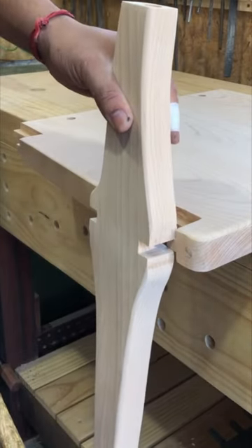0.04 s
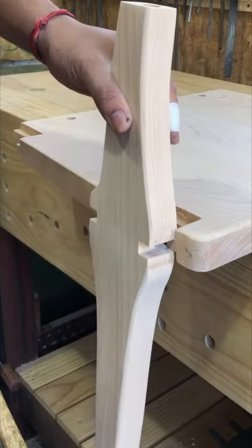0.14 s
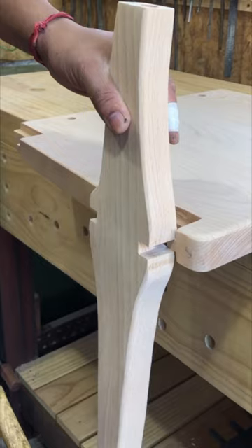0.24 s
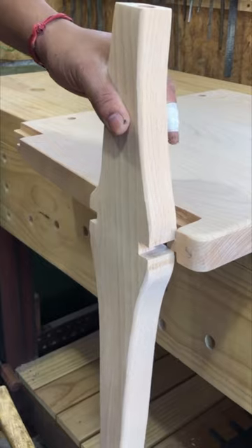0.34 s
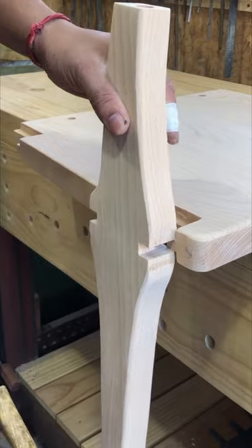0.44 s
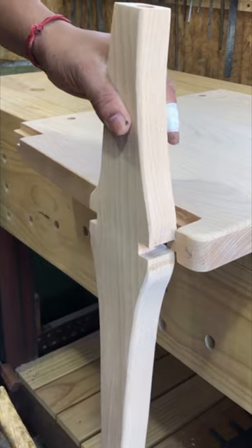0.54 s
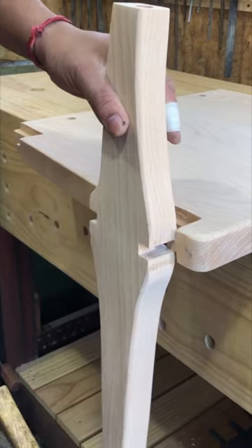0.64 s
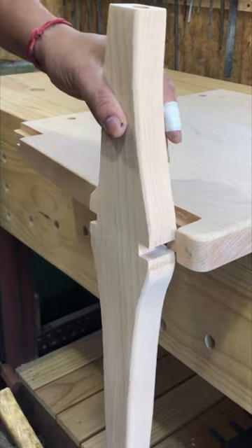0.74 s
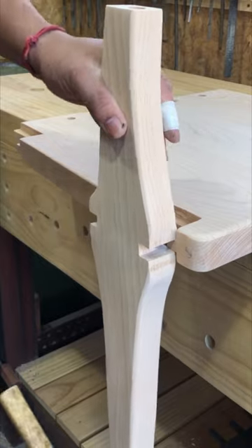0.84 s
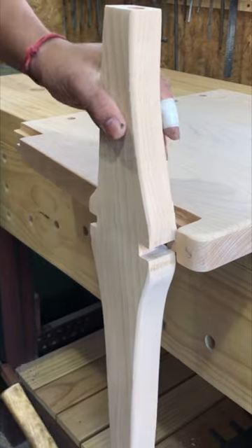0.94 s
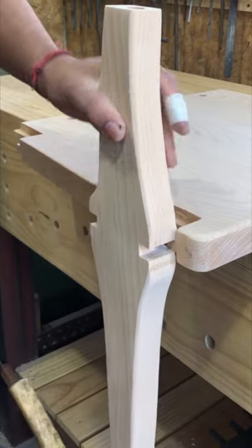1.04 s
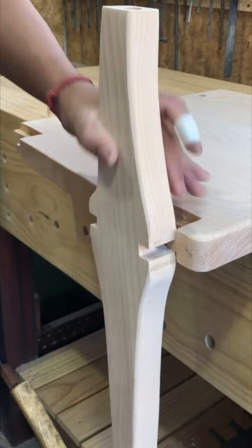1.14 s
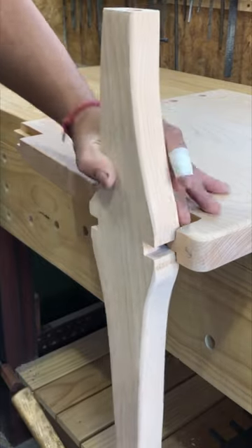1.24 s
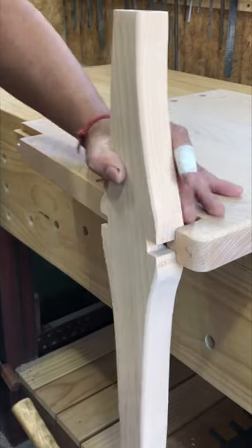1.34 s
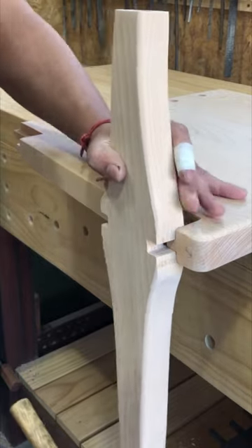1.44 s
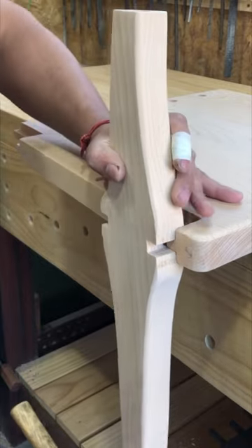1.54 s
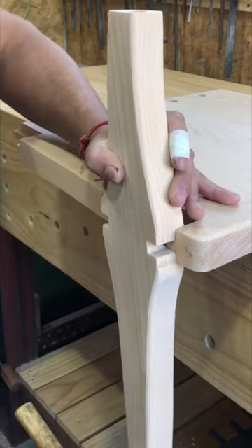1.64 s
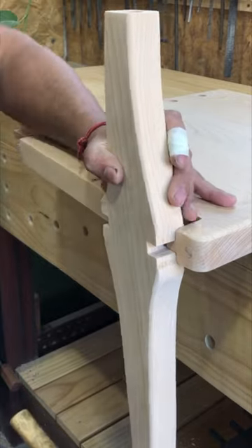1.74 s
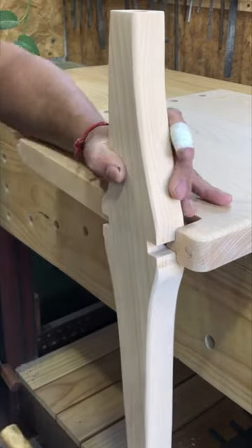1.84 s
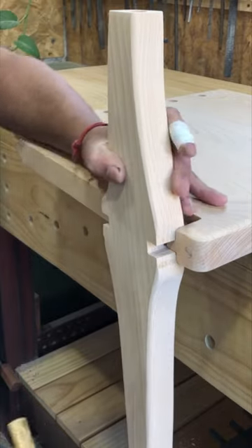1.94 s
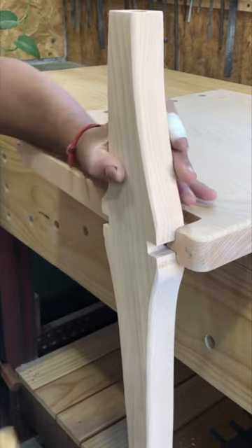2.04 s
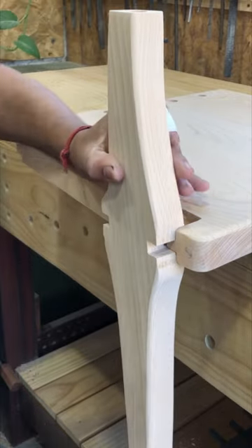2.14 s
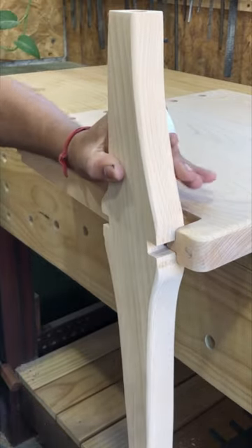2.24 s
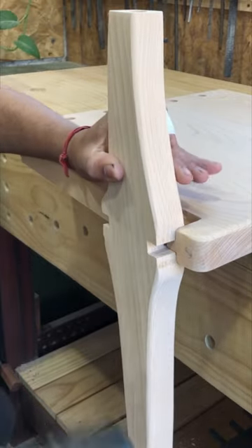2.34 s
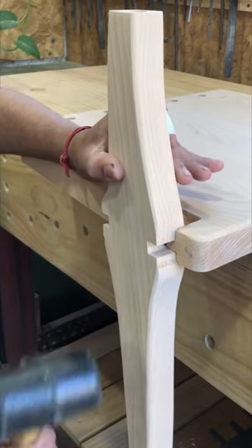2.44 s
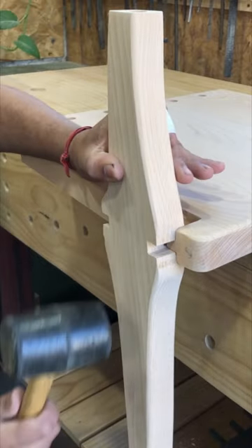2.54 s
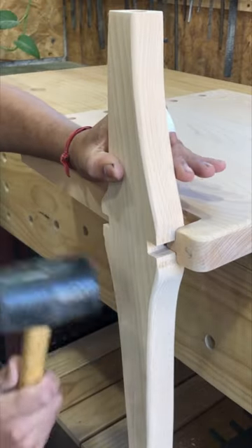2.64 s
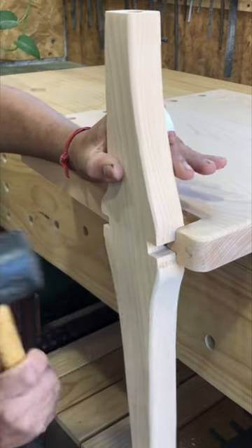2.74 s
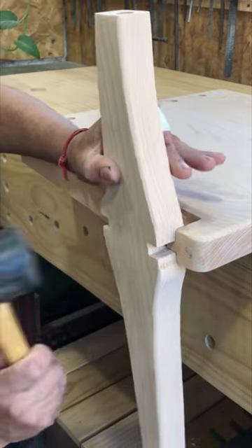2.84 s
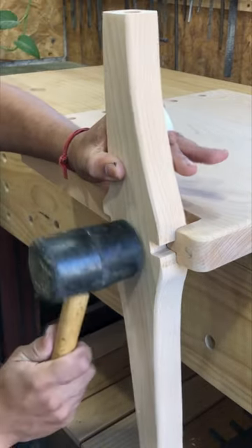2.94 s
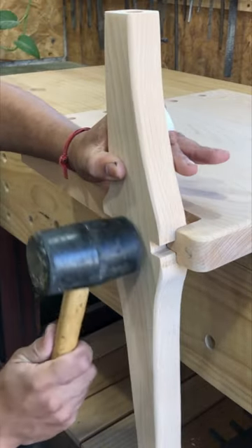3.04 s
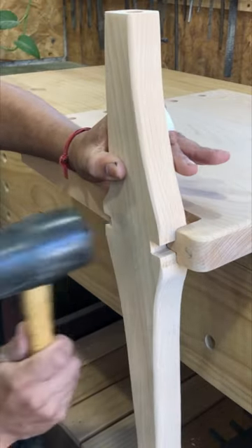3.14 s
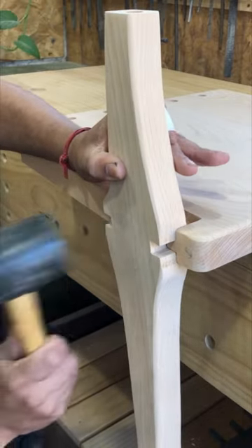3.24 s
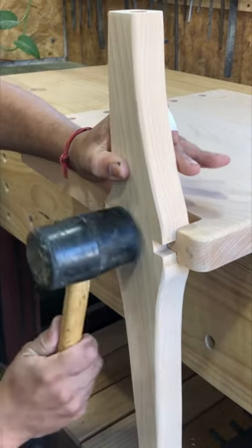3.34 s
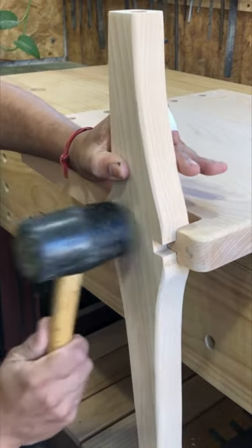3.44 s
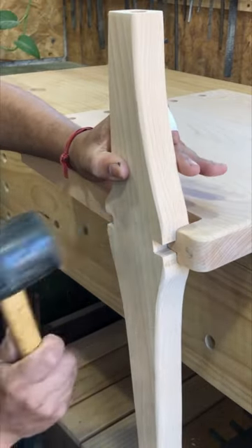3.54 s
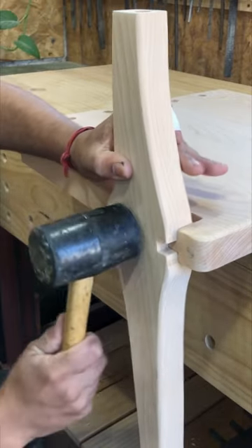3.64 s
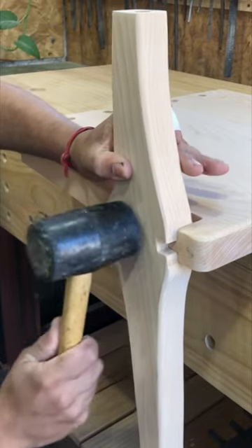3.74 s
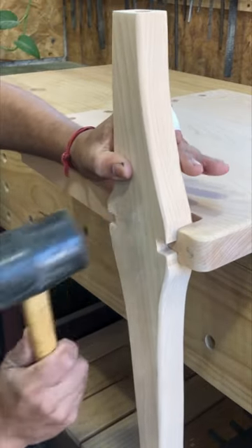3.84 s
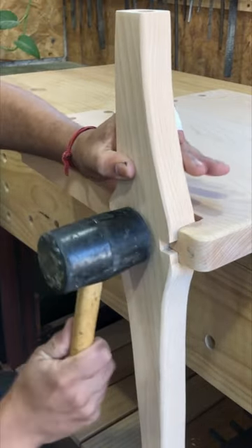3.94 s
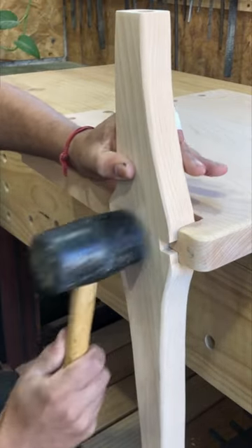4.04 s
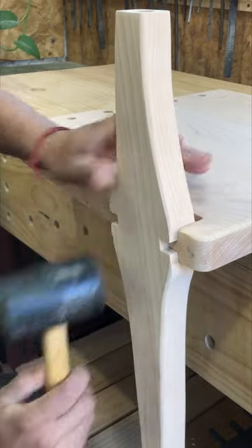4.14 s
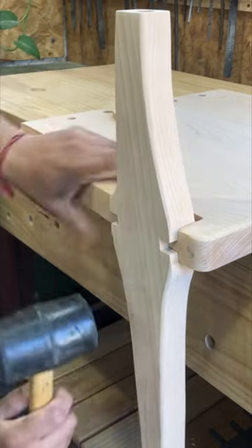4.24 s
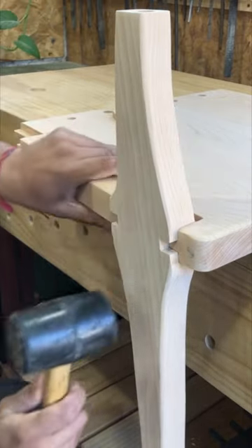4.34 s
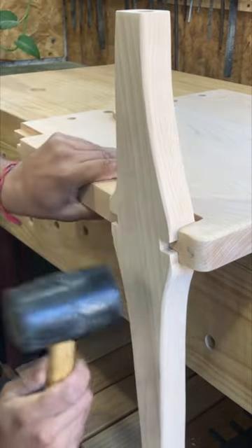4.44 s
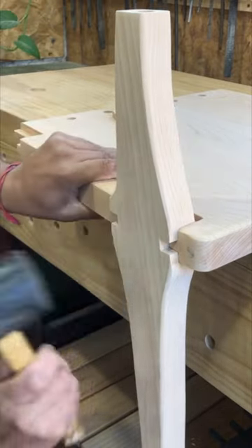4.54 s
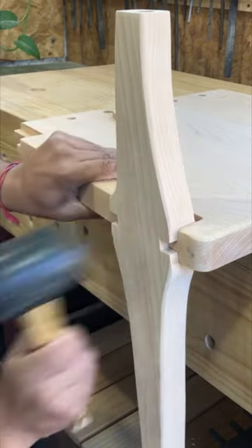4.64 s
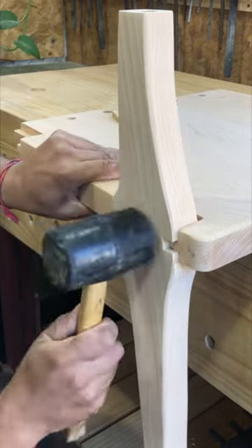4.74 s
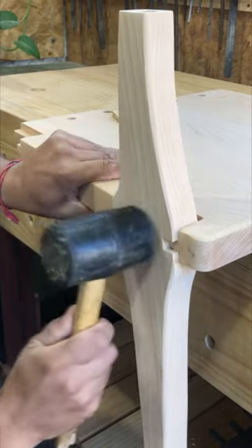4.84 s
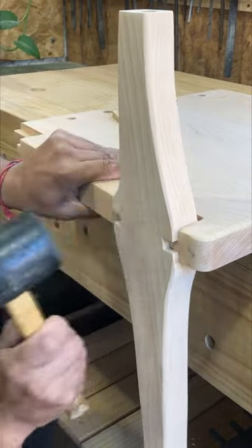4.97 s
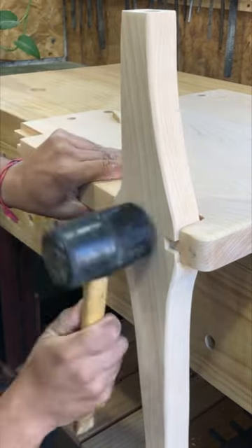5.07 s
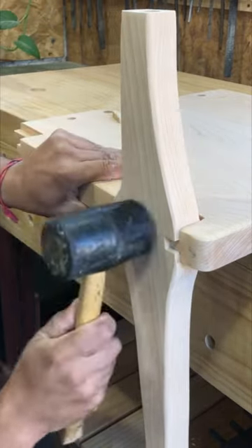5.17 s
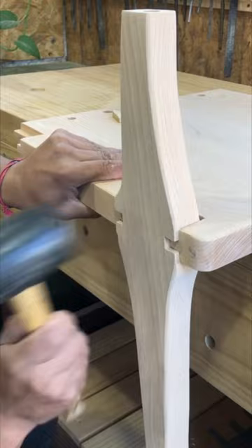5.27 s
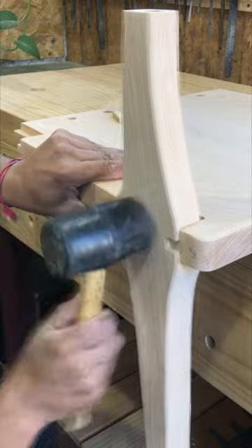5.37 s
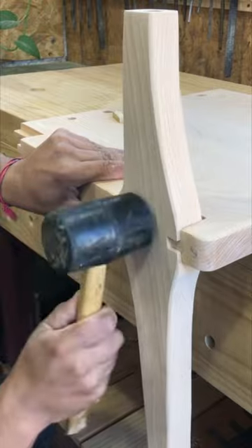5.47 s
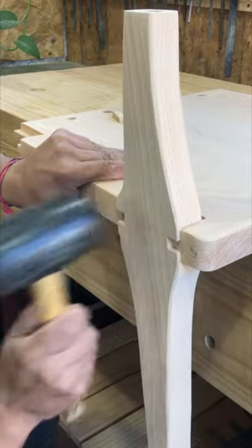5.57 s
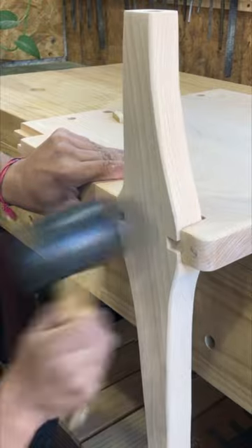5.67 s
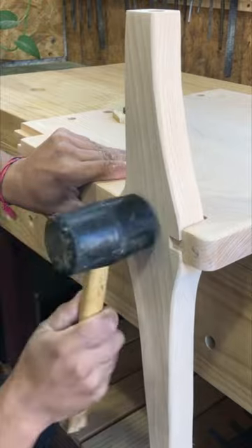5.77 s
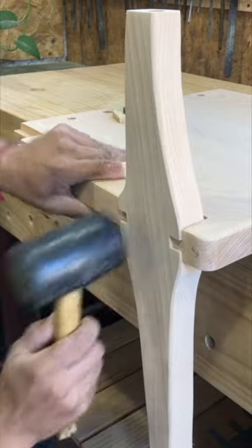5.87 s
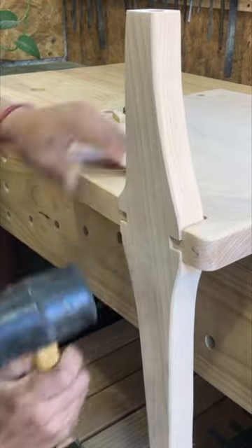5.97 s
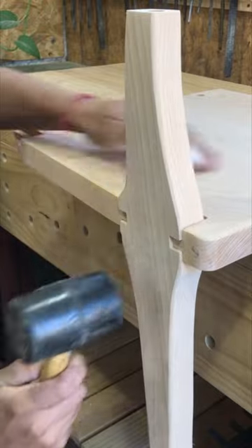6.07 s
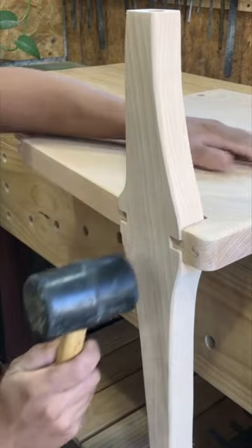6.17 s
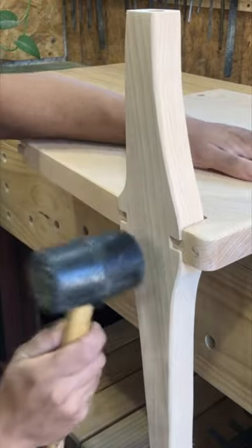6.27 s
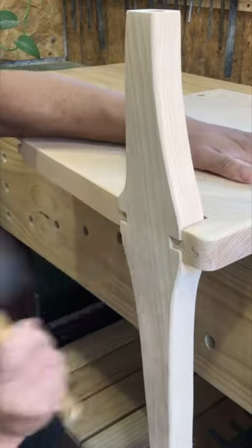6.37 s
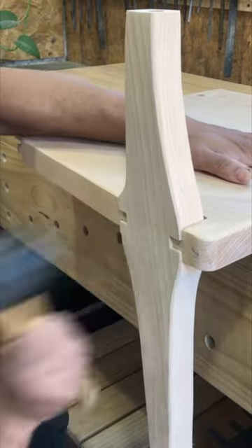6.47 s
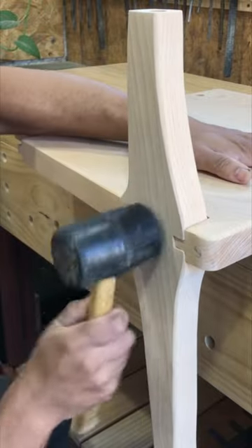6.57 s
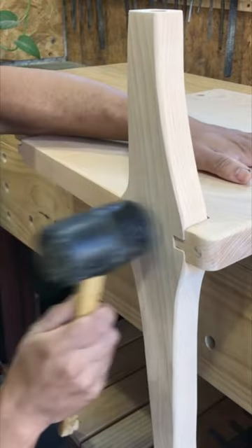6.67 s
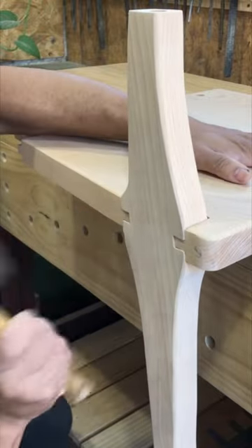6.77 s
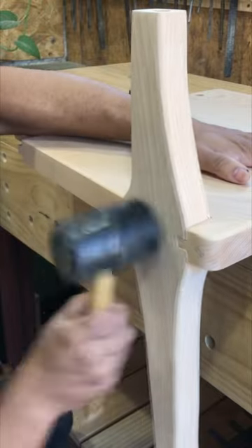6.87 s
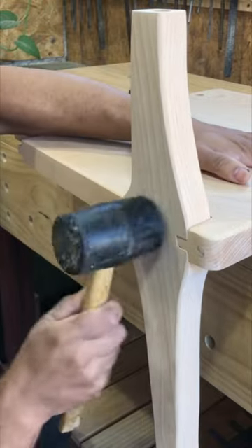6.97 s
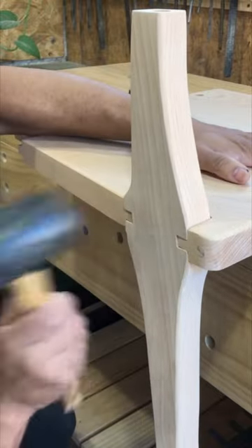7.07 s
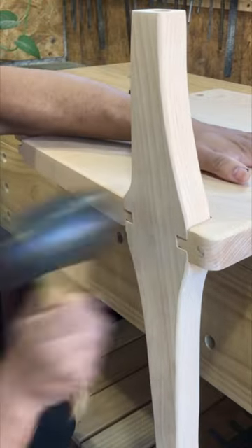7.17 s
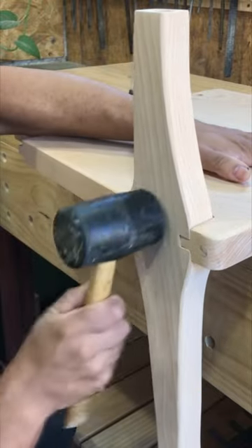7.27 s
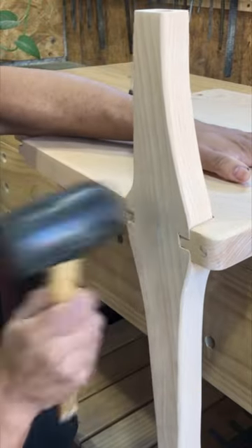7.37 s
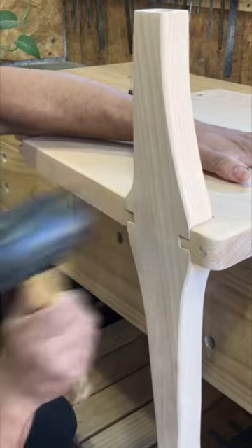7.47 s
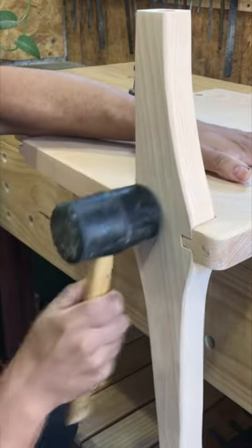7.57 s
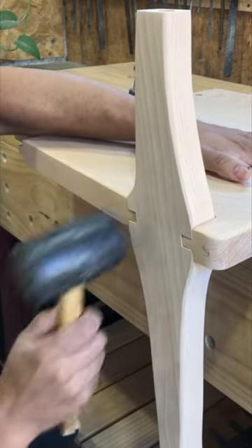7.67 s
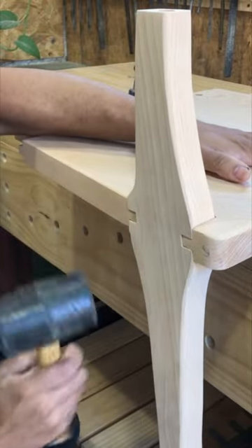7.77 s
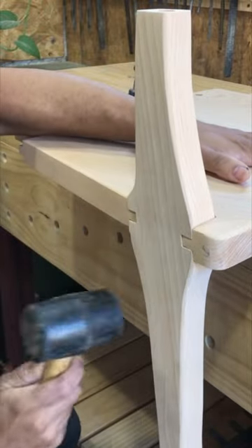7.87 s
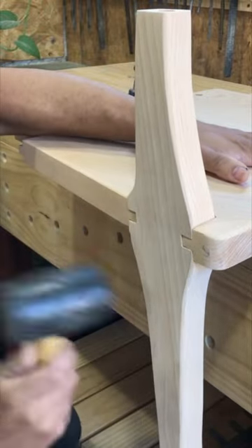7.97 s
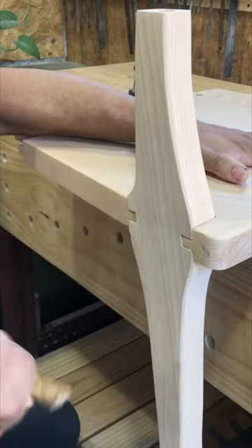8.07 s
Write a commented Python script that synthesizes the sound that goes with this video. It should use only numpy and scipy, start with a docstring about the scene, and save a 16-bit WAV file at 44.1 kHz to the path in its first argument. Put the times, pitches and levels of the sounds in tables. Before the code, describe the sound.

In a quiet workshop, skin brushes a wooden seat, then twelve solid, woody mallet blows fall in three groups of four, with short room reverberation.

```python
"""A soft bump and faint scrapes in quiet workshop air, then a hand sliding over a wooden chair seat.
A rubber mallet then drives the leg into its seat joint on a workbench, in three runs of four blows.
Air, skin and scrapes are coloured noise under swelling envelopes; bumps and ticks are short noise bursts.
Each blow is a noise crack, a sum of decaying modes and a dense reverberant return of the shop.
The recorder's fast limiter ducks the first instant of the blows."""
import sys
import numpy as np
from scipy import signal
from scipy.fft import rfft, irfft
from scipy.io import wavfile
from scipy.ndimage import uniform_filter1d, minimum_filter1d

SR = 44100
rng = np.random.default_rng(int(sys.argv[2]) if len(sys.argv) > 2 else 0)


def materialize(psi):
    """Save the field psi as 16-bit PCM at rate SR to the path in sys.argv[1].

    A 1-D psi becomes a single channel; in a 2-D psi each row is a channel.
    """
    bounded = np.clip(np.atleast_2d(psi).T, -1, 1)
    quanta = np.round(bounded * 32767).astype(np.int16)
    wavfile.write(sys.argv[1], SR, quanta)


N = 357651
LENGTH = 24576  # samples in one short sound
EDGE_HZ = 16000  # upper band limit
AGE, TIME = np.arange(LENGTH) / SR, np.arange(N) / SR  # s since a sound began, s since the scene began


def amp(db):
    """Level to gain: 20 dB is a factor of ten in amplitude."""
    return 10 ** (np.asarray(db) / 20)


def unit(x):
    """Normalization: scales to rms 1."""
    return x / np.sqrt(np.mean(x ** 2) + 1e-20)


def read(points, hz):
    """Interpolation of a (f, value) table along a logarithmic frequency axis."""
    f, value = np.transpose(points)
    return np.interp(np.log(hz + 1), np.log(f + 1), value)


def add(mix, s, sound):
    """Superposition: adds a sound to the mix from time s on."""
    part = mix[max(round(s * SR), 0):][:len(sound)]
    part += sound[:len(part)]


def shaped(x, db_at):
    """Linear filtering: weights the spectrum of x by a rule Hz -> dB, then scales to rms 1."""
    hz = np.fft.rfftfreq(len(x), 1 / SR)
    return unit(irfft(rfft(x) * amp(db_at(hz)), len(x)))


def noise(db_at, size=LENGTH):
    """Coloured noise: white noise through a spectral weighting."""
    return shaped(rng.standard_normal(size), db_at)


def burst(db_at, size=256):
    """Impulsive excitation: before colouring, the first `size` samples hold every frequency evenly."""
    even = irfft(np.exp(2j * np.pi * rng.random(size // 2 + 1)))
    tail = rng.standard_normal(LENGTH - size) * even.std()
    return shaped(np.concatenate([even, tail]), db_at)


def lowpass(x, hz):
    """First-order low-pass: a gentle, causal loss of treble."""
    sos = signal.butter(1, min(hz, SR / 2 - 1), fs=SR, output="sos")
    return signal.sosfilt(sos, x)


def accent(x, hz, db, sharpness=7):
    """Resonance: lifts the band that the spot of the blow or the joint favours."""
    band = signal.lfilter(*signal.iirpeak(hz, sharpness, fs=SR), x)
    return x + (amp(db) - 1) * band


def dying(x, t60_at):
    """Frequency-dependent damping: each frequency decays with its own t60."""
    hz, t, z = signal.stft(x, SR, nperseg=256)
    decay = amp(-60 * t / t60_at(hz)[:, None])
    return signal.istft(z * decay, SR, nperseg=256)[1][:len(x)]


def swell(peak_s, db, swell_s, t60):
    """Friction follows speed: the level grows 20 dB over the swell time, peaks, then dies away."""
    rise_db = 20 * np.maximum(peak_s - TIME, 0) / swell_s
    fall_db = 60 * np.maximum(TIME - peak_s, 0) / t60
    return amp(db - rise_db - fall_db)


# workshop reverberation: (f/Hz, t60/s)
SHOP_DECAY = [(70, 0.35), (200, 0.34), (500, 0.32), (1200, 0.32), (3000, 0.29), (6000, 0.25), (10000, .23),
              (16000, 0.12)]


def reverberant(x, late_db=-27, late_t60=0.7):
    """Double-slope reverberation: a fast decay in the shop over a weak lingering one."""
    early = dying(x, lambda hz: read(SHOP_DECAY, hz))
    return early + amp(late_db - 60 * AGE / late_t60) * lowpass(x, 1200)


# spectrum of the workshop air: (f/Hz, level/dB per Hz)
AIR_SPECTRUM = [(18, -35), (30, -3.5), (86, -0.5), (170, 0), (287, -3), (540, -4.5), (684, -9.5),
                (1630, -13.5), (2120, -20), (9220, -30), (14800, -29.5), (16000, -33.5)]
# resonances of the scrapes: (f/Hz, width/Hz, level/dB)
SCRAPE_RESONANCES = [(790, 90, 3), (950, 61, 3), (1214, 110, -2.5), (2000, 250, -12.5)]
# faint scrapes in the shop: (t/s of the loudest moment, level/dB, swell/s, fade t60/s)
SCRAPES = [(.03, -52, 0.048, 0.15), (.17, -52, 0.3, 0.54), (.7, -66.5, 0.26, 1), (0.921, -64, 0.23, 0.43)]


def background(air_db=-62.5, sinks_from_s=5.7, sink_db_per_s=3):
    """Incoherent sources add in power: quiet air with a low rustle, and faint resonant scrapes."""
    steady = amp(air_db - sink_db_per_s * np.maximum(TIME - sinks_from_s, 0))
    # a low rustle while the hand changes its hold
    rustle = swell(1.95, -58, 1.55, 1.4)
    air = noise(lambda hz: read(AIR_SPECTRUM, hz), size=N) * np.hypot(steady, rustle)

    def resonances_db(hz):
        """Resonance curves: each scrape band peaks at its own frequency."""
        return 20 * np.log10(sum(amp(db) / (1 + (2 * (hz - f) / width) ** 2)
                                 for f, width, db in SCRAPE_RESONANCES))

    scrape = noise(resonances_db, size=N)
    return air + scrape * np.sqrt(sum(swell(*row) ** 2 for row in SCRAPES))


# strokes of the hand over the seat:
# (t/s of the fastest moment, level/dB, swell/s, fade t60/s, bite of the grain/dB relative to the hiss)
STROKES = [(.725, -68.5, .05, .35, 3), (1.076, -57.5, 0.033, 0.17, 1), (1.19, -49, .17, 0.18, -16),
           (1.825, -61, .05, 0.45, -6), (2.045, -51.5, .012, 0.22, -2), (2.15, -56, 0.45, 0.79, 1.5),
           (2.36, -65.5, 0.77, 1.8, 1), (2.9, -72.5, 0.68, 5.5, -1.5), (4.17, -45.5, 0.16, 0.49, -11.5),
           (4.28, -61.5, 0.052, 0.47, 0.5), (6.18, -54.5, 0.14, 0.77, -4), (6.3, -58.5, .16, 0.198, -1),
           (6.42, -75, .1, .5, -0.5)]
# quick swipes of the palm: (t/s, level/dB, rise/s, fade t60/s)
SWIPES = [(1.201, -34.5, 0.012, 0.25), (1.413, -39, 0.055, 0.26), (1.625, -37.5, 0.0087, 0.27)]
# spectrum of the swipes: (f/Hz, level/dB per Hz)
SKIN_SPECTRUM = [(200, -1.5), (900, -2.5), (2000, 0.5), (4500, 5.5), (7000, 1), (11000, -4.5), (16000, -6)]


def hand(catch_db=1.35):
    """Friction noise: skin hisses over sanded wood, catching unevenly on the grain."""
    fine_spectrum = [(1500, -5), (5500, -3), (10000, -2.0), (16000, -2.0)]
    coarse_spectrum = [(300, -20), (1300, 6.0), (4200, 7), (7000, -2), (16000, -16)]
    fine = noise(lambda hz: read(fine_spectrum, hz), size=N)
    coarse = noise(lambda hz: read(coarse_spectrum, hz), size=N)
    hiss_power, bite_power = np.zeros((2, N))
    for peak_s, db, swell_s, t60, bite_db in STROKES:
        power = swell(peak_s, db, swell_s, t60) ** 2
        hiss_power += power
        bite_power += power * amp(bite_db) ** 2
    out = fine * np.sqrt(hiss_power) + coarse * np.sqrt(bite_power)
    for s, db, rise_s, t60 in SWIPES:
        fade_db = 60 * np.maximum(AGE - rise_s, 0) / t60
        envelope = np.minimum(AGE / rise_s, 1) * amp(db - fade_db)
        add(out, s, envelope * noise(lambda hz: read(SKIN_SPECTRUM, hz)))
    catching = unit(uniform_filter1d(rng.standard_normal(N), size=90))
    return out * amp(catch_db * catching)


# soft bumps of hand and mallet on the wood: (t/s, level/dB, f/Hz above which it is dull)
BUMPS = [(.021, -32, 298), (.11, -44.5, 230), (1.255, -36.5, 200), (1.322, -34, 930), (1.338, -23, 340),
         (1.372, -32, 300), (1.418, -32, 2600), (2.0, -48, 400), (2.703, -37.5, 750)]
# small ticks of wood and handle: (t/s, level/dB, f/Hz above which it is dull)
TICKS = [(1.073, -41.5, 8000), (1.218, -27.5, 7000), (1.36, -34, 3060), (2.698, -40, 2315),
         (2.708, -35.5, 1760), (2.731, -42, 2300), (2.807, -42.5, 3000)]


def taps(rows, low_hz, t60, rise_s, shop_db, seat_db):
    """Contact stiffness: a softer touch is a duller burst; it excites the seat and carries into the shop."""
    out = np.zeros(N)
    for s, db, dull_hz in rows:
        def contact_db(hz):
            """Band limits of the contact, with the seat's band around 215 Hz."""
            treble_loss = (1 + (hz / dull_hz) ** 4) * (1 + (hz / dull_hz / 2) ** 4)
            bass_loss = 1 + (low_hz / (hz + 1)) ** 4
            seat = seat_db * np.exp(-((hz - 215) / 85) ** 2)
            return seat - 10 * np.log10(treble_loss * bass_loss)

        touch = noise(contact_db)
        # the reversed noise keeps its colour but differs from the direct sound
        sound = touch * amp(-60 * AGE / t60) + amp(shop_db) * reverberant(touch[::-1])
        add(out, s, amp(db) * sound * (1 - np.exp(-AGE / rise_s)))
    return out


# the dense ring of the wood as the shop returns it: (f/Hz, level/dB per Hz)
RING_SPECTRUM = [(30, -38.5), (65, -10.5), (130, -13.5), (320, -4), (620, -1), (720, -5), (900, -0.5),
                 (1650, -5.5), (1950, -9.5), (3200, -11.5), (3700, -16.5), (5000, -16.5), (8000, -22.5),
                 (10500, -22), (13000, -25), (16000, -24.5)]


def crowded(x, ripple_db):
    """High modal density: countless lesser modes of the wood put narrow peaks and dips above 1100 Hz."""
    grid = np.geomspace(1100, EDGE_HZ, len(ripple_db))
    return shaped(x, lambda hz: read(RING_SPECTRUM, hz) + np.interp(hz, grid, ripple_db, left=0))


def build_up(x, bass_s=0.0068, treble_s=0.00097, split_hz=450):
    """Growth of the room field: treble fills the shop almost at once, bass more slowly."""
    hz = np.fft.rfftfreq(len(x), 1 / SR)
    bass = irfft(rfft(x) / (1 + (hz / split_hz) ** 4), len(x))
    bass_growth = 1 - np.exp(-(AGE / bass_s) ** 2)
    treble_growth = 1 - np.exp(-(AGE / treble_s) ** 2)
    return bass * bass_growth + (x - bass) * treble_growth


# modes of bench, seat and leg; each hold of the hand damps them differently:
# (f/Hz, t60/s, level/dB in hold 0, level/dB in hold 1, level/dB in hold 2), before gain and extra losses
MODES = [(72, 0.7, -44, -37, -40), (88, 0.7, -36, -37, -36), (133, 0.45, -36, -36, -33),
         (162, 0.45, -39, -34, -31), (201, 0.5, -39, -27, -30), (239, 0.45, -38, -30, -32),
         (279, 0.31, -32, -14, -27), (297, 0.31, -27, -21, -26), (314, 0.31, -25, -18, -25),
         (352, 0.31, -21, -37, -29), (385, 0.35, -19, -29, -40), (423, 0.33, -16, -21, -25),
         (457, 0.31, -28, -18, -22), (477, 0.31, -25, -20, -21), (571, 0.31, -23, -18, -27),
         (628, 0.31, -22, -21, -25), (691, 0.31, -23, -20, -26), (783, 0.31, -33, -19, -18),
         (852, 0.31, -18, -24, -41), (932, 0.38, -20, -19, -17), (971, 0.38, -18, -20, -20),
         (1058, 0.31, -16, -17, -21), (1080, 0.31, -15, -18, -20), (1167, 0.31, -20, -25, -18),
         (1223, 0.31, -18, -27, -25), (1345, 0.31, -28, -20, -21), (1375, 0.31, -25, -20, -21),
         (1619, 0.31, -23, -22, -24), (2435, 0.31, -24, -24, -37), (4264, 0.48, -48, -35, -46)]


def wood_ring(hold, phases, gain_db=3, bench_db=3, scatter_db=2, swell_s=0.016):
    """Modal superposition: damped sines swell as the blow spreads; no two blows ring quite alike."""
    hz, t60, *levels = np.transpose(MODES)[:, :, None]
    strength, pitch = rng.standard_normal((2, len(MODES), 1))
    waves = np.sin(2 * np.pi * (hz * (1 + .001 * pitch) * AGE + phases))
    # higher modes hold for 47 ms, then sink faster for a while
    sink_db = np.clip((AGE - 0.047) * 92, 0, 6) * np.minimum(hz / 1080, 1.3)
    # modes under 100 Hz start louder, with an extra loss of 32.5 dB per s
    bench_lift_db = (bench_db - 32.5 * AGE) * (hz < 100)
    level_db = gain_db + levels[hold] + scatter_db * strength + bench_lift_db - sink_db
    ring = (amp(level_db - 60 * AGE / t60) * waves).sum(0)
    return ring * (1 - np.exp(-(AGE / swell_s) ** 2))


# the crack where leg meets seat: (f/Hz, level/dB per Hz)
CRACK_SPECTRUM = [(40, -40.5), (150, -22.5), (330, -6.5), (750, 1.5), (1500, 3), (2000, -8.5), (3200, -11),
                  (4200, -7), (7000, -20), (16000, -16.5)]
# short resonances of the joint in each crack: (f/Hz, lift/dB, sharpness Q)
JOINT = [(624, 5.5, 5.7), (1510, 2.5, 7), (2560, 5, 16), (3060, 4.5, 14)]


def crack(snap_db=5, snap_t60=0.0056, body_db=3, hold_s=0.0067, build_s=0.001,
          after_db=-16, after_t60=.07):
    """Impact then friction: a sharp snap, and ringing chatter while the leg slips into the joint."""
    chatter = burst(lambda hz: read(CRACK_SPECTRUM, hz))
    for hz, db, sharpness in JOINT:
        chatter = accent(chatter, hz, db, sharpness)
    slip = np.exp(-(AGE / hold_s) ** 6) * (1 - np.exp(-AGE / build_s))
    after = amp(after_db - 60 * AGE / after_t60)
    snap_spectrum = [(300, -8), (3000, -4.5), (7000, -4.5), (13000, -8.5), (16000, -2)]
    snap = burst(lambda hz: read(snap_spectrum, hz), size=64) * amp(snap_db - 60 * AGE / snap_t60)
    sound = snap + amp(body_db) * lowpass(chatter, 5000) * (slip + after)
    return sound - lowpass(sound, 240)


def fore_tick(tick_db=-35, flutter_db=-39, lead_s=.0232):
    """Precursor: a decaying tick and a brief flutter are heard faintly just ahead of each blow."""
    tick = burst(lambda hz: -10 * np.log10(1 + (hz / 4500) ** 2), size=64)
    tick = tick * amp(tick_db - 60 * AGE / 0.027)
    flutter = lowpass(noise(lambda hz: read(CRACK_SPECTRUM, hz)), 4000)
    return lead_s, tick + flutter * amp(flutter_db) * (AGE < lead_s)


# mallet blows: (t/s, force level/dB, low thump/dB, brightness/dB, hold of the hand (rounded, limited to 0-2),
# accented band f/Hz, accent/dB, crack level/dB)
BLOWS = [(2.9600, -10, 7.5, 0, 0, 825, 4.5, -4), (3.3228, -6.5, 5, 0.5, 0, 1060, 4, -8),
         (3.6598, -5, 4.5, 0, 0, 1120, 5.5, -2), (3.9590, -6, 3, -1, 0, 856, 4, -3.5),
         (4.7028, -4, 5, 2.5, 1.49, 1020, 4, -5.5), (5.0633, -4, 1.5, 1, 1.1, 278, 3, 0),
         (5.403, -3, 2, 2, 1.57, 1550, 1, -0.5), (5.716, -5, 3.5, 2, 1.51, 1330, 2, 0),
         (6.5363, -2.5, -1, -1.5, 2, 188.3, 6, 3), (6.8979, -2.5, -5, -4.5, 2, 3250, 3.5, 0.5),
         (7.222, -6, 5.5, -1.5, 3.1, 920, 4.5, -2), (7.5343, -2.5, -2.5, -6.5, 1.6, 885, 1.5, -0.5)]


def mallet(shop_db=-7.0, thump_hz=420, bright_hz=2400):
    """Impact excitation: each blow is a crack, the ring of the modes and the dense return of the shop."""
    out = np.zeros(N)
    # shared by all blows; each adds its own scatter
    paths, phases = rng.standard_normal(LENGTH), rng.random((len(MODES), 1))
    ripple = rng.standard_normal(size=420)
    for s, force_db, thump_db, bright_db, hold, accent_hz, accent_db, crack_db in BLOWS:
        ripple_db = 3 * np.clip(ripple + rng.standard_normal(len(ripple)), -2.5, 2.5)
        dense = crowded(paths + 2 * rng.standard_normal(LENGTH), ripple_db)
        shop = build_up(reverberant(dense))
        ring = wood_ring(int(np.clip(round(hold), 0, 2)), phases)
        blow = amp(crack_db) * crack() + ring + amp(shop_db) * shop
        # how squarely the rubber lands tips the balance of thump and treble
        thump = (amp(thump_db) - 1) * lowpass(blow, thump_hz)
        treble = (amp(bright_db) - 1) * (blow - lowpass(blow, bright_hz))
        add(out, s, amp(force_db) * accent(blow + thump + treble, accent_hz, accent_db))
        lead_s, tick = fore_tick()
        add(out, s - lead_s, amp(force_db) * tick)
    return out


def scene():
    """Superposition of everything at the bench, in mono."""
    bumps = taps(BUMPS, low_hz=108, t60=0.049, rise_s=0.0044, shop_db=-4.0, seat_db=6.5)
    ticks = taps(TICKS, low_hz=400, t60=0.0087, rise_s=0.00018, shop_db=-10, seat_db=-1)
    return (background() + hand() + bumps + ticks + mallet())[None]


def record(dry, ceiling_db=-5, recover_db_per_s=480, low_cut_hz=52, full_scale=2.3):
    """Peak limiting with linear recovery in dB, then soft saturation and band limits."""
    peak_db = 10 * np.log10(2 * abs(uniform_filter1d(dry[0] ** 2, size=24)) + 1e-12)
    # the detected peak falls at a constant rate until a louder one replaces it
    fall_db = TIME * recover_db_per_s
    envelope_db = np.maximum.accumulate(peak_db + fall_db) - fall_db
    over_db = np.maximum(envelope_db - ceiling_db, 0)
    duck_db = uniform_filter1d(minimum_filter1d(-over_db, size=25), size=25)
    held = full_scale * np.tanh(dry * amp(duck_db) / full_scale)
    low_cut = signal.butter(4, low_cut_hz, "high", fs=SR, output="sos")
    high_cut = signal.firwin(255, EDGE_HZ, window=("kaiser", 8), fs=SR)
    return signal.oaconvolve(signal.sosfilt(low_cut, held), high_cut[None], "same")


dry = scene()
out = record(dry)
materialize(out)
```